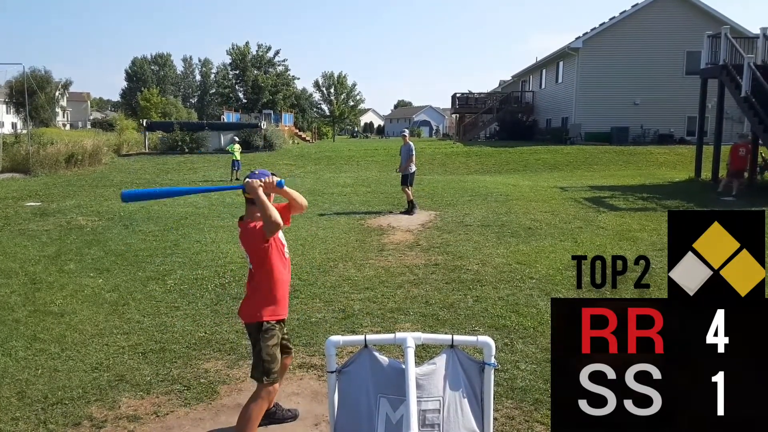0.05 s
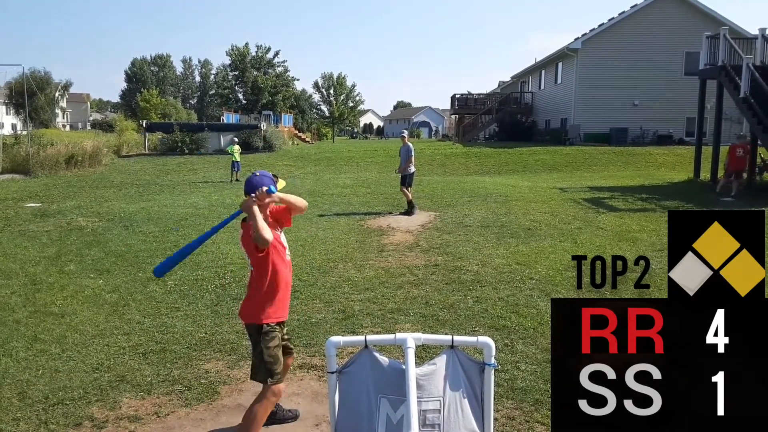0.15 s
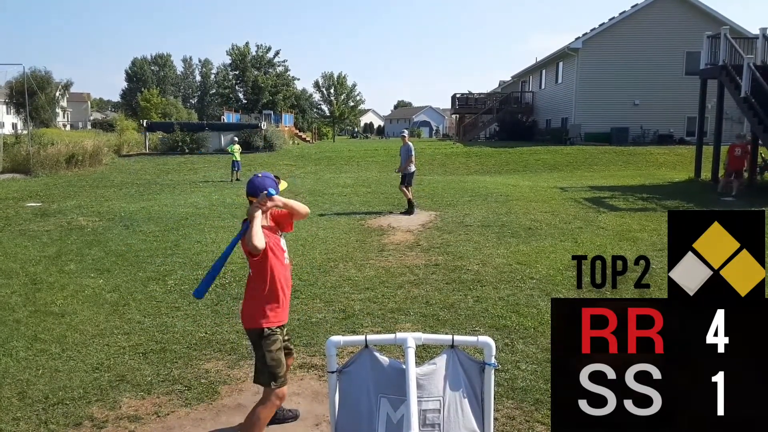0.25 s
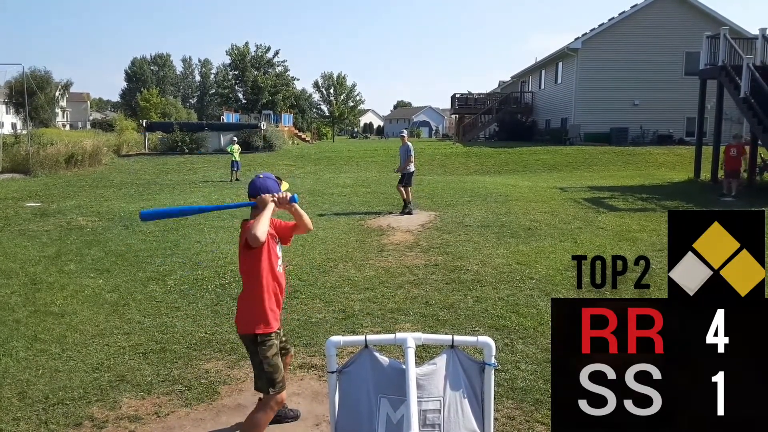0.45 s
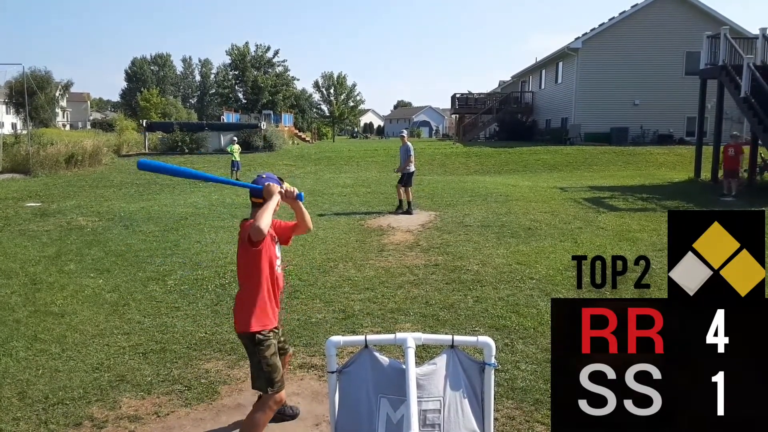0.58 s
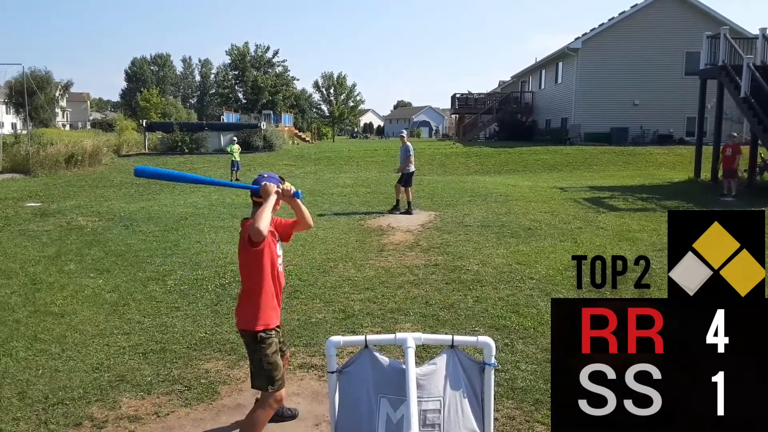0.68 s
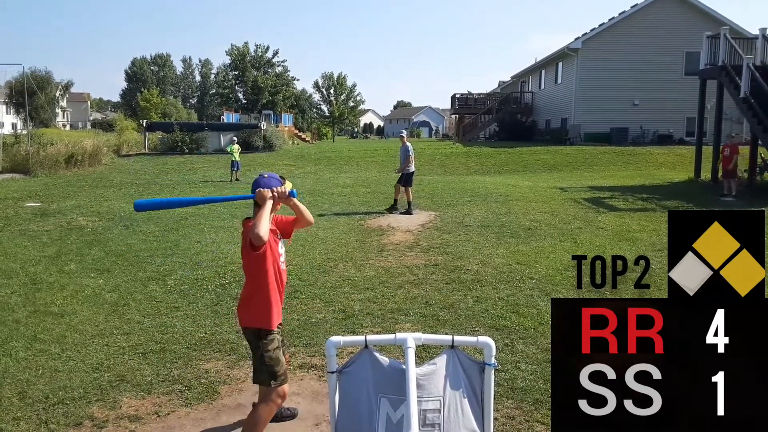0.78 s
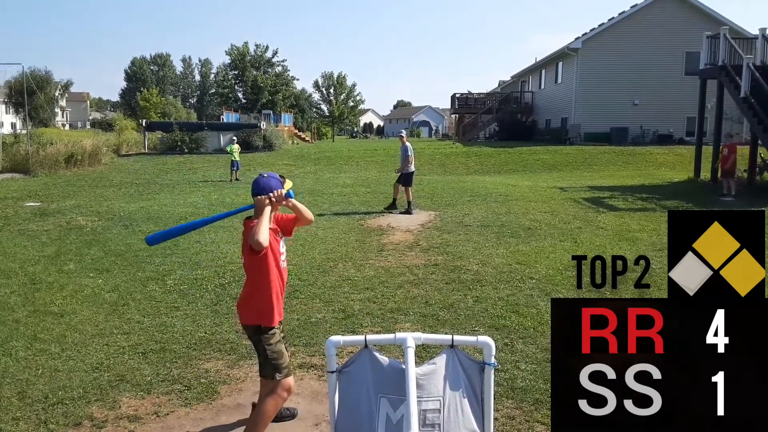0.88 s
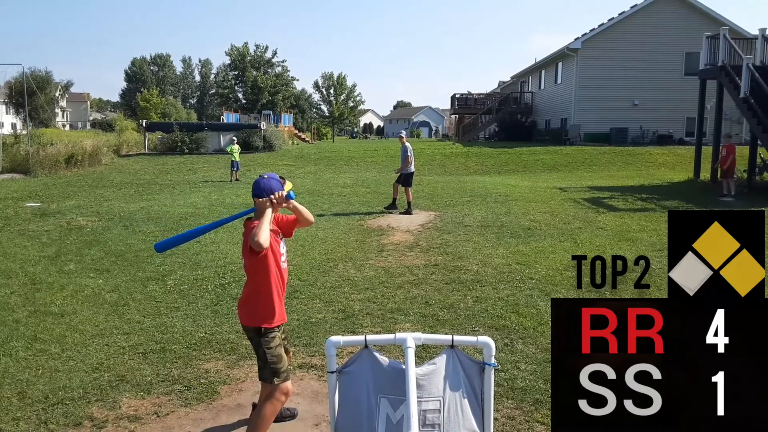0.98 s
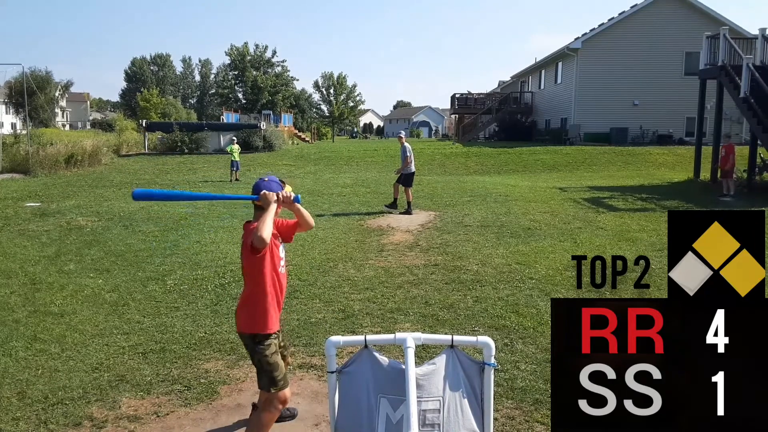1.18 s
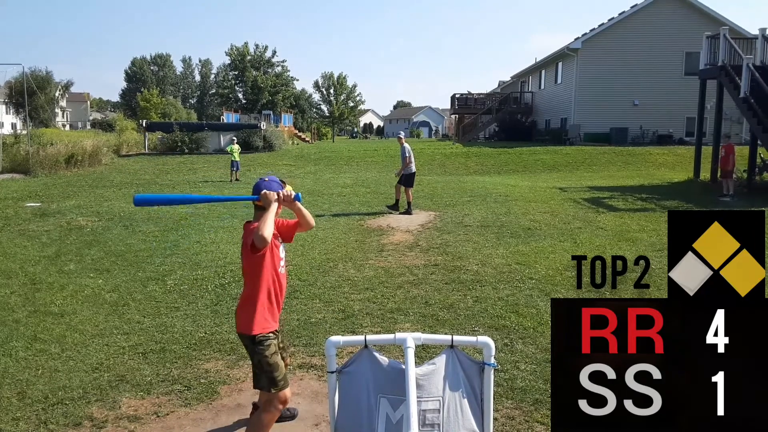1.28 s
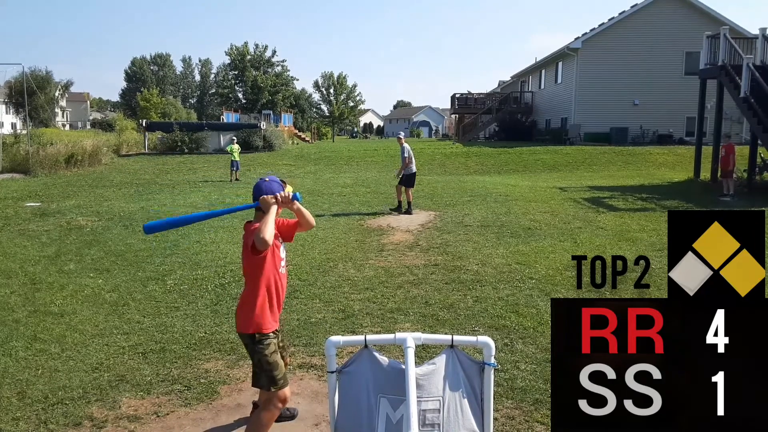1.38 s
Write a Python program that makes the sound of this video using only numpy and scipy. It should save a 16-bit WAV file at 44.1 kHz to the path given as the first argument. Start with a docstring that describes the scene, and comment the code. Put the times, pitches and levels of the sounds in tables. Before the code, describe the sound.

A plastic ball cracks against a pipe frame, with wind and insects in a backyard.

```python
"""A grassy backyard, heard through a microphone with two ports. A plastic ball cracks against a hard
pipe frame, which rings and shivers; the yard scatters the sound and a house throws back a faint echo.
A few light knocks fall around the hit. Wind buffets the ports and a shoe scuffs the grass.
Out in the lawn a cricket and two kinds of katydid sing, and a farther insect rasps over distant hiss."""
import sys
import numpy as np
from scipy import signal
from scipy.fft import rfft, irfft
from scipy.io import wavfile
from scipy.ndimage import uniform_filter1d

SR = 44100
rng = np.random.default_rng(int(sys.argv[2]) if len(sys.argv) > 2 else 0)


def store_wav(level_fs):
    """Save 16-bit WAV to argv[1]."""
    pcm = np.round(np.clip(np.atleast_2d(level_fs), -1, 1) * 32767)
    wavfile.write(sys.argv[1], SR, pcm.T.astype(np.int16))


N = 63945
T = np.arange(N) / SR

# Ball meets rattling frame. Each row: start in seconds, relative level in dB, decay time in seconds.
CONTACTS = [(.4996, -24, .002), (.5007, -9, .001), (.5014, 0, .0013), (.5027, 2, .001), (.5078, -9, .0016),
            (.5172, -7, .0006), (.5203, -17, .002)]
# Tone of a contact, then of the pipes' shiver. Each row: frequency in Hz, relative level in dB.
CRACK_COLOUR = [(100, -23), (220, -1), (450, -9.5), (750, -9), (950, 5), (1250, 3.5), (1600, -3.5),
                (2100, -2), (2750, 15), (3300, -2.5), (4500, 7), (6300, -4.5), (8500, -5.5), (11000, -6),
                (16000, -10)]
SHIVER_COLOUR = [(100, -8.5), (230, -0.5), (450, -2.5), (950, 1), (1250, 0), (1600, -8), (2600, -1),
                 (3300, -10), (4600, 0), (6500, -12), (8500, -6), (16000, -13.5)]
# How long the pipes shiver. Each row: frequency in Hz, seconds to fall 60 dB.
SHIVER_T60 = [(300, 0.15), (1000, 0.06), (3000, 0.097), (8000, 0.074), (16000, 0.065)]
# Ring of the frame. Each row: frequency in Hz, relative level in dB, seconds to fall 60 dB.
FRAME_MODES = [(466, -9, 0.13), (616, -7, 0.066), (945, -4, 0.049), (1090, -7, 0.043), (1212, 2.5, 0.041),
               (1860, -13.5, .065), (2237, -22, .08), (2610, 11, 0.016), (2904, 4, 0.049), (3530, -9, 0.12),
               (4790, -14, 0.086), (4580, -10.5, 0.027), (5407, -8, 0.083), (7370, 0, .05)]
def ball_crack():
    """A quick cluster of contacts; the frame rings and shivers, the yard and the house answer."""
    pulses = [amp(db) * (T >= start) * np.exp(-np.maximum(T - start, 0) / fade)
              for start, db, fade in CONTACTS]
    force = np.sqrt(sum(pulse ** 2 for pulse in pulses))
    crunch = np.sign(noise_pair(alike=.88)) * force
    snap = amp(-6.5) * colour(crunch, CRACK_COLOUR)
    hit_s, rise_s = CONTACTS[2][0], .0022
    frame = amp(-21.5) * ring(hit_s, FRAME_MODES) * np.clip((T - hit_s) / rise_s, 0, 1)
    shiver = amp(-12.5) * tail(colour(crunch, SHIVER_COLOUR), SHIVER_T60)
    return shade_right_port(snap + frame + shiver) + yard_scatter(crunch) + house_echo()


# Shading on the microphone's right side. Each row: frequency in Hz, gain in dB.
PORT_SHADE = [(300, 2.5), (1300, 1.5), (2400, -3), (8000, -5), (16000, -2.5)]
def shade_right_port(pair, lag_s=.0001):
    """The crack reaches the right port a little later and duller."""
    left, right = pair
    hz = np.fft.rfftfreq(N, 1 / SR)
    delay = np.exp(-2j * np.pi * hz * lag_s)
    return np.array([left, irfft(rfft(right) * amp(read(PORT_SHADE, hz)) * delay, N)])


# Tone of the yard's scatter. Each row: frequency in Hz, relative level in dB.
YARD_COLOUR = [(100, -3), (700, 2), (1500, -2), (6000, -5), (10000, -5), (16000, -7)]
# How long it hangs in the yard. Each row: frequency in Hz, seconds to fall 60 dB.
YARD_T60 = [(200, 0.99), (1000, 1), (4000, 1), (14000, 1.0)]
def yard_scatter(crunch):
    """The hit comes back diffusely from around the yard."""
    return amp(-26.5) * tail(colour(crunch, YARD_COLOUR), YARD_T60) * ports(right_db=-1.5)


# Tone of the echo off the house. Each row: frequency in Hz, relative level in dB.
ECHO_COLOUR = [(100, -29), (500, 8), (1100, -6), (2000, -4.5), (4000, -9.5), (16000, -21)]
def house_echo():
    """A dull smear of noise returns from the distant house about 0.3 seconds after the hit."""
    return amp(-49) * colour(noise_pair(alike=.24) * decay(start=.806, t60=.3), ECHO_COLOUR)


# Knocks around the hit. Each row: start in seconds, relative level in dB, seconds to fall 60 dB,
# treble cutoff in Hz.
KNOCKS = [(.1, -36.5, 0.032, 3730), (0.1542, -26.5, 0.042, 6640), (0.5887, -28, 0.099, 4270),
          (0.6114, -27.5, 0.054, 6150), (.643, -35.5, 0.035, 1020)]
# Their tone. Each row: frequency in Hz, relative level in dB.
KNOCK_COLOUR = [(150, -4), (450, -0.5), (900, 1.5), (1500, -6), (2600, 2), (3800, 3), (5500, 0.5),
                (8000, -3.5), (16000, 1.5)]
# Their hollow body. Each row: frequency in Hz, relative level in dB, seconds to fall 60 dB.
HOLLOW_MODES = [(428, -0.5, 0.1), (597, -1, .07), (769, -3.5, 0.082), (988, -2, .06), (1318, -0.5, 0.044)]
def knocks(snap_s=.0013):
    """Light plastic knocks, a little to the left: a snap and a short hollow ring."""
    bursts = np.zeros((2, N))
    for start, db, t60, cutoff_hz in KNOCKS:
        envelope = decay(start, t60) * (1 + .56 * np.exp(-abs(T - start) / snap_s))
        lowpass = signal.butter(2, cutoff_hz, fs=SR)
        bursts += amp(db) * signal.lfilter(*lowpass, noise_pair(alike=.22) * envelope)
    body = sum(amp(db - 17.5) * ring(start, HOLLOW_MODES) for start, db, _, _ in KNOCKS)
    return colour(bursts, KNOCK_COLOUR) * ports(right_db=-4.5) + body


# Wind pressure right on each port. Each row: time in seconds, level in dB.
WIND_LEFT = [(0, -30), (.07, -58), (.16, -34), (.2, -40.5), (.28, -38), (.35, -22), (.39, -31.5),
             (.435, -19.5), (.47, -30), (.53, -28), (.56, -36), (.68, -40.5), (.79, -39.5), (.88, -53.5),
             (1.18, -55), (1.28, -48.5), (1.38, -44.5), (1.45, -58)]
WIND_RIGHT = [(0, -47.5), (.11, -45), (.18, -45), (0.228, -30.5), (0.268, -37), (0.298, -20.5), (.38, -27),
              (.43, -33), (.47, -31), (.505, -19), (0.559, -40.5), (.67, -62), (.76, -56), (.87, -60.5),
              (1.2, -60.5), (1.3, -49.5), (1.45, -57)]
# Tone of the rumble, then of the gusts. Each row: frequency in Hz, relative level in dB.
RUMBLE_COLOUR = [(20, -39.5), (45, -10.5), (70, 4.5), (105, 1), (200, -9.5), (320, -22.5), (500, -43.5),
                 (900, -54.5), (3000, -58)]
GUST_COLOUR = [(40, -33), (130, -4.5), (220, 5.5), (350, -5.5), (520, -17), (800, -32.5), (1500, -54),
               (4000, -57)]
# Eddies hitting the microphone. Each row: centre in seconds, level in dB before panning, pitch in Hz,
# side from 0 (left) to 1 (right).
EDDIES = [(0.016, -27, 117, 0.19), (.296, -16.5, 129, 1), (0.424, -13.5, 102, 0.64),
          (.441, -8, 129.6, 0.23), (0.504, -11, 171, 0.49), (0.601, -23, 113, 0.029), (0.681, -28, 108, 0),
          (0.576, -23.5, 217, 1), (0.747, -26.5, 117, 0.59), (.797, -28, 140, .1), (1.369, -26.5, 128, 0)]
# Sharp gusts. Each row: centre and half length in seconds, level in dB before panning, side as above.
GUSTS = [(0.225, 0.0092, -36.5, 0.67), (.292, 0.0068, -21, 0.99), (0.34, 0.0098, -28, 0.32),
         (0.362, 0.0091, -29, .7), (0.41, 0.012, -25, 0.94), (0.427, 0.018, -24.5, 0.72),
         (0.48, 0.011, -28, 0.35), (0.531, 0.0083, -23, 0.12)]
def wind():
    """Low turbulence, unrelated at the two ports, with thumping eddies and brighter flapping gusts."""
    pressure = np.array([amp(np.interp(T, *np.transpose(curve))) for curve in (WIND_LEFT, WIND_RIGHT)])
    rumble = steady(colour(noise_pair(alike=0), RUMBLE_COLOUR), samples=1800)
    flap = steady(colour(noise_pair(alike=0), GUST_COLOUR), samples=800)
    thumps = np.zeros((2, N))
    for centre, db, hz, side in EDDIES:
        suction = -np.cos(2 * np.pi * hz * (T - centre))
        thumps += amp(db) * suction * bell(centre, 1.9 / (np.pi * hz)) * pan(side)
    gusts = sum(amp(db) * bell(centre, half) * pan(side) for centre, half, db, side in GUSTS)
    return pressure * rumble + thumps + gusts * flap


# Scuffs at ground level. Each row: start in seconds, length in seconds, relative level in dB.
SCUFFS = [(1.067, 0.13, -54), (1.271, 0.082, -45)]
# Tone of the grass. Each row: frequency in Hz, relative level in dB.
GRASS_COLOUR = [(300, -35), (1000, -10), (2500, -10), (4000, -3.5), (7000, -3), (11000, 1), (13500, -1.5),
                (16000, -32)]
def shoe_scuffs(grain_db=3.5):
    """A shoe brushes through the grass in short swells of grainy noise."""
    envelope = sum(amp(db) * abs(np.sin(np.pi * progress(start, length) ** .92)) ** .5
                   for start, length, db in SCUFFS)
    grains = unit(amp(grain_db * flutter(width_hz=220).real))
    return colour(noise_pair(alike=.56) * envelope * grains, GRASS_COLOUR) * ports(right_db=-1.5)


# The katydid near the microphone. Each row: start in seconds, length in seconds, relative level in dB.
BUZZES = [(.205, 0.078, -45.5), (.607, 0.076, -45.5), (.94, 0.088, -44), (1.262, 0.082, -43)]
def near_katydid(rate_hz=110.3, pitch_hz=8450, fall_hz=414, swell_db=2.5):
    """Short swelling buzzes made of rough pulses that each fall in pitch."""
    buzz = np.zeros(N)
    for start, length, db in BUZZES:
        along = progress(start, length)
        envelope = (along > 0) * (along < 1) * amp(db + swell_db * (along - 1.5))
        stroke = (T - start) * rate_hz % 1
        note = tone(pitch_hz - fall_hz * (stroke - .5)) * (1 + .22 * flutter(width_hz=750))
        buzz += envelope * np.sin(np.pi * stroke) ** 2 * note.real
    return buzz * ports(right_db=-2.5)


# A cricket in the lawn, off to the left. Each row: start of a wing stroke in seconds, level in dB.
WING_STROKES = [(-.005, -52.5), (.245, -60), (0.269, -51), (0.304, -50), (0.339, -50.5), (0.619, -55),
                (.658, -53.5), (0.894, -59), (0.925, -52.5), (0.958, -52), (1.145, -63), (1.174, -53),
                (1.209, -52.5), (1.247, -52)]
def cricket(stroke_s=.026, pitch_hz=5312, fall_hz=594):
    """Each wing stroke is a whistle that sags as the wing slows."""
    song = np.zeros(N)
    for start, db in WING_STROKES:
        along = progress(start, stroke_s)
        song += amp(db) * np.sin(np.pi * along) ** 2 * tone(pitch_hz - fall_hz * along ** 2).real
    return song * ports(right_db=-9.5)


def katydid_chorus(throb_hz=58):
    """Far off to the left, katydids blur into one throbbing band close to the near one's note."""
    throb = 1 + .13 * np.sin(2 * np.pi * throb_hz * T)
    band = (tone(hz=8285) * flutter(width_hz=293)).real
    return amp(-55.5) * unit(throb * band) * ports(right_db=-10.5)


def ticking_katydid(rate_hz=92.3, pitch_hz=13600, fall_hz=5000):
    """The second kind ticks high and steadily, each tick a noisy downward sweep."""
    stroke = T * rate_hz % 1
    sweep = (tone(pitch_hz - fall_hz * (stroke - .5)) * flutter(width_hz=1800)).real
    return amp(-61) * unit(np.sin(np.pi * stroke) ** 6 * sweep) * ports(right_db=-6)


# A farther insect, to the right. Each row: centre and half length in seconds, left-port level in dB.
RASPS = [(.14, .02, -59), (.865, .025, -62), (1.22, .025, -62)]
def insect_rasps():
    """Faint short rasps just above the buzzing katydids' note."""
    envelope = sum(amp(db) * bell(centre, half) for centre, half, db in RASPS)
    return envelope * (tone(hz=9200) * flutter(width_hz=200)).real * ports(right_db=3)


# Tone of the distant background. Each row: frequency in Hz, relative level in dB.
AIR_COLOUR = [(30, 16), (120, 4), (400, 7), (1000, -2), (2500, -1.5), (4500, -6), (6800, -9), (9000, -4),
              (10500, -5.5), (13000, -1.5), (16000, -3)]
def open_air():
    """A steady bed of outdoor air and insect hiss."""
    return amp(-52) * colour(noise_pair(alike=.21), AIR_COLOUR) * ports(right_db=-2)


def amp(db):
    """Decibels to gain."""
    return 10 ** (np.asarray(db) / 20)


def unit(x):
    """Scales to rms 1."""
    return x / np.sqrt(np.mean(x ** 2) + 1e-20)


def steady(pair, samples):
    """Holds the running rms near 1."""
    return pair / np.sqrt(uniform_filter1d(pair ** 2, size=samples, axis=1) + 1e-12)


def read(points, hz):
    """Reads a table on a log-frequency axis."""
    table_hz, value = np.transpose(points)
    return np.interp(np.log(hz + 1), np.log(table_hz + 1), value)


def colour(pair, points):
    """Minimum-phase filter with the given spectrum; white noise keeps its power."""
    gain = unit(amp(read(points, abs(np.fft.fftfreq(8192, 1 / SR)))))
    response = np.exp(np.conj(signal.hilbert(np.log(gain))))
    taps = np.fft.ifft(response).real[:4096]
    return signal.fftconvolve(pair, taps[None], axes=1)[:, :N]


def noise_pair(alike):
    """White noise at the two ports, with correlation `alike`."""
    left, other = rng.standard_normal((2, N))
    return np.array([left, alike * left + np.sqrt(1 - alike ** 2) * other])


def ports(right_db):
    """Gains of the left and right port."""
    return np.array([[1], [amp(right_db)]])


def pan(side):
    """Shares a sound between the ports, 0 left to 1 right."""
    return np.array([[1 - side], [side]])


def progress(start, length):
    """Runs from 0 to 1 over an event."""
    return np.clip((T - start) / length, 0, 1)


def bell(centre, half):
    """Smooth swell, down to 1/e at `half` seconds either side."""
    return np.exp(-((T - centre) / half) ** 2)


def decay(start, t60):
    """Sudden start and exponential decay."""
    return (T >= start) * 1000. ** (-np.maximum(T - start, 0) / t60)


def ring(start, modes):
    """Decaying modes of a struck body."""
    return sum(amp(db) * decay(start, t60) * np.sin(2 * np.pi * hz * (T - start))
               for hz, db, t60 in modes)


def flutter(width_hz):
    """Complex random wavering of a narrow band, rms 1."""
    noise = rng.standard_normal(N) + 1j * rng.standard_normal(N)
    band = np.exp(-.5 * (np.fft.fftfreq(N, 1 / SR) / width_hz) ** 2)
    waver = np.fft.ifft(np.fft.fft(noise) * band)
    return waver / np.std(waver)


def tone(hz):
    """Complex tone on a pitch curve; its real part has rms 1."""
    return np.sqrt(2) * np.exp(2j * np.pi * np.cumsum(hz * np.ones(N)) / SR)


def tail(pair, t60s):
    """Diffuse tail whose bands die at their own speed."""
    hz, t, bands = signal.stft(rng.standard_normal((2, N)), SR, nperseg=128)
    fade = 1000. ** (-t / read(t60s, hz)[:, None])
    impulse = signal.istft(bands * fade, SR, nperseg=128)[1][:, :N]
    impulse /= np.linalg.norm(impulse, axis=1, keepdims=True)
    return signal.fftconvolve(pair, impulse, axes=1)[:, :N]


def scene():
    """The backyard as it reaches the two ports."""
    return (open_air() + ball_crack() + knocks() + wind() + cricket() + near_katydid()
            + katydid_chorus() + ticking_katydid() + insect_rasps() + shoe_scuffs())


def record(dry, ceiling=.85, edge_hz=16050):
    """The peak of the crack saturates softly; then the recorder's band limit."""
    limited = ceiling * np.tanh(dry / ceiling)
    lowpass = signal.firwin(301, edge_hz, window=("kaiser", 9), fs=SR)
    return signal.oaconvolve(limited, lowpass[None], "same")


dry = scene()
out = record(dry)
store_wav(out)
```